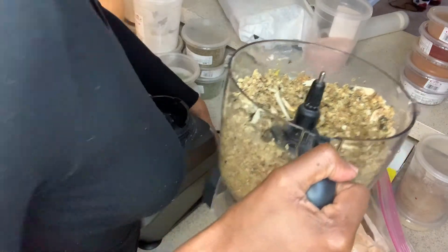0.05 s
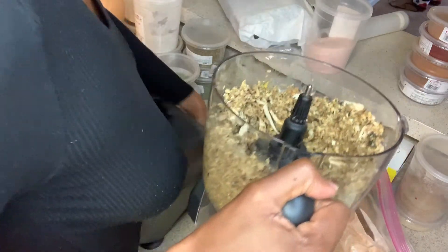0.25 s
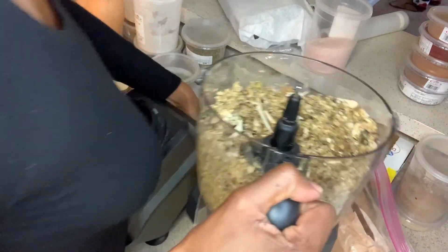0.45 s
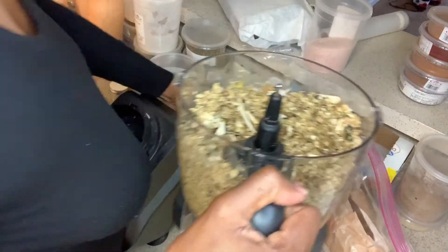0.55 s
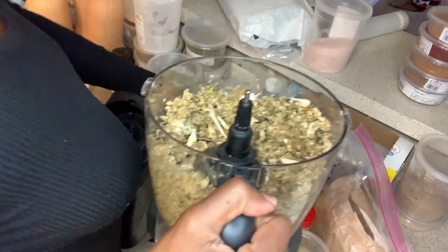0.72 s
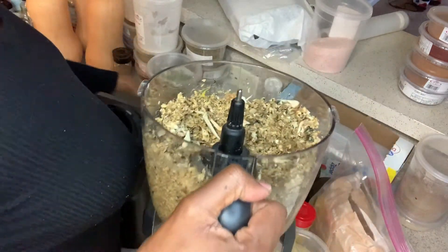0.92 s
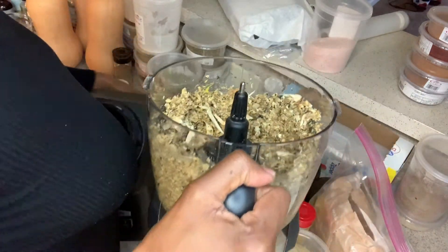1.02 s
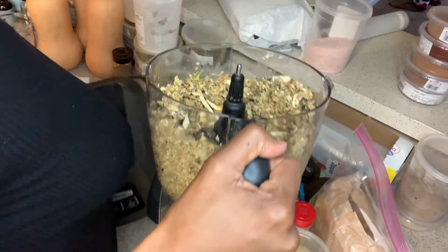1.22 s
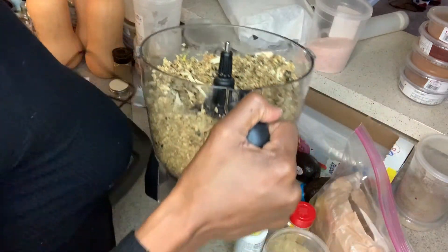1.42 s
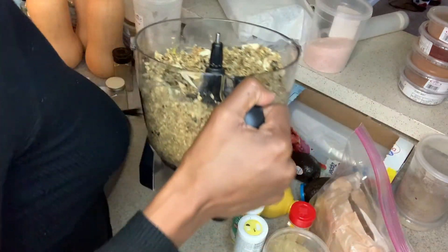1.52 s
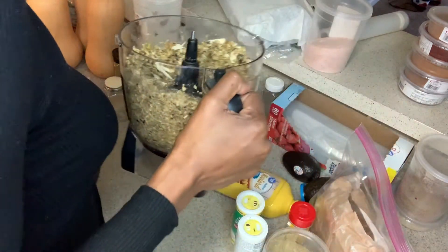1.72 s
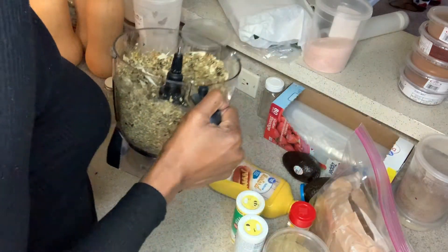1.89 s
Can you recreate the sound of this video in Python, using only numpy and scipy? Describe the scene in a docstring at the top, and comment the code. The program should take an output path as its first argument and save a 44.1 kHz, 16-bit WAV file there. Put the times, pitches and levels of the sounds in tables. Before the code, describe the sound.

Close stereo sound of a food processor bowl being handled in a lively kitchen: brief scrape, sharp loud clack, soft bumps and ticks, later blade clicks and dull dragging knocks, over faint appliance hum.

```python
"""Food processor bowl coming loose

A full plastic bowl is handled on a kitchen counter, close to the microphone. It scrapes free of its
catch, then lands one loud clack: a coloured noise crack over ringing modes, with a thump in the counter.
Its parts tick, snap and knock dully, built from short noise bursts; the loose blade pings and food rustles.
A dense decaying echo rings after each blow, over wavering appliance hum and soft air noise."""
import sys
import numpy as np
from scipy import signal
from scipy.fft import rfft, irfft
from scipy.io import wavfile
from scipy.ndimage import uniform_filter1d

SR = 44100
rng = np.random.default_rng(int(sys.argv[2]) if len(sys.argv) > 2 else 0)


def master_out(mix):
    """Clip the mix to full scale and print it as 16-bit PCM to the path in sys.argv[1]."""
    frames = np.transpose(np.atleast_2d(mix))
    ceiling = np.clip(frames, -1, 1)
    pcm = np.round(ceiling * 32767).astype(np.int16)
    wavfile.write(sys.argv[1], SR, pcm)


N = 85995  # length in samples

CLACK_LEAD_S, PARTS_LEAD_S = 0.00008, -0.000024  # how much earlier the left microphone hears it
TICK_WET_DB = 3  # room tail on the ticks and the rustle


def amp(db):
    """Decibels to gain."""
    return 10 ** (np.asarray(db) / 20)


def read(points, hz):
    """Reads a (frequency, value) table on a log-frequency axis."""
    f, value = np.transpose(points)
    return np.interp(np.log(hz + 1), np.log(f + 1), value)


def unit(x):
    """Scales to rms 1."""
    return x / np.sqrt(np.mean(x ** 2) + 1e-20)


def add(mix, start_s, sound):
    """Mixes a sound in at start_s, cut off at the end of the mix."""
    part = mix[round(start_s * SR):][:len(sound)]
    part += sound[:len(part)]


def causal(gain, size=4096):
    """Minimum phase: the most compact causal response with this spectrum."""
    both_sides = np.r_[gain, gain[-2:0:-1]]
    log_gain = np.log(np.maximum(both_sides, 1e-5))
    spectrum = np.exp(np.conj(signal.hilbert(log_gain)))
    return np.fft.ifft(spectrum).real[:size]


def contact(colour_db, decay_s, rise_s, size=4096):
    """A burst of tiny impacts with an even spectrum, coloured by colour_db(hz)."""
    t = np.arange(size) / SR
    hz = np.fft.rfftfreq(size, 1 / SR)
    envelope = np.exp(-t / decay_s) * (1 - np.exp(-t / rise_s))
    burst = rfft(rng.standard_normal(size) * envelope)
    # divide by the smoothed spectrum, so that only the colour shapes the burst
    local = np.sqrt(uniform_filter1d(abs(burst) ** 2, size=15))
    colour = causal(amp(colour_db(hz)) / local)
    return signal.fftconvolve(irfft(burst), colour)[:size]


def mode(t, hz, t60_s):
    """One vibration dying by 60 dB in t60_s."""
    return np.exp(-np.log(1000) * t / t60_s) * np.sin(2 * np.pi * hz * t)


def ring(modes):
    """A struck part: the sum of its modes, neighbours swinging in opposite directions."""
    t = np.arange(SR // 4) / SR
    return sum((-1) ** k * amp(db) * mode(t, hz, t60_s) for k, (hz, db, t60_s) in enumerate(modes))


# modes of the bowl: pitch_hz, level_db, t60_s
BOWL_MODES = [(684, -19, 0.046), (1014, -18, .035), (1263, -11, .03), (1567, -18, .035), (1950, -16, .025),
              (2046, -13, 0.025), (2960, -15, .03), (3180, -17, .025), (3770, -14.5, 0.019),
              (3980, -17.5, 0.044)]
# colour of the contact crack: freq_hz, level_db
CRACK_COLOUR = [(100, 25.5), (400, 15), (1000, 18.5), (2000, 17), (4000, 19.5), (4900, 5), (7000, 7.5),
                (8600, -17.5), (10500, 7), (14000, -2.5), (16000, -16.5)]
# colour of the scrape over the catch, and of the rebounds: freq_hz, level_db
CATCH_COLOUR = [(100, 6), (400, 11.5), (1000, 11.5), (2000, 12.5), (4000, 9), (4900, -8), (7000, -8),
                (8600, -40), (11000, -19), (16000, -26.5)]
# the bowl rebounds after the blow: start_s, level_db
BOWL_REBOUNDS = [(0.2429, -3), (.2532, -2), (0.2569, -5), (0.273, -5), (.2820, -7.5), (.3120, -9)]
CATCH_AT_S, CATCH_DECAY_S, CATCH_RISE_S = 0.2172, 0.019, 0.0014
BLOW_AT_S, CRACK_DELAY_S = 0.2337, 0.000696  # the crack follows the wall's snap
CRACK_DECAY_S, CRACK_RISE_S, REBOUND_DECAY_S = 0.0022, 0.000067, 0.0013
SNAP_HZ, SNAP_PEAK_S, SNAP_DB = 1474, 0.00027, -3.5
RING_DB, CLACK_WET_DB = -1.5, -1.5


def clack():
    """A short scrape, then the blow: a snap of the wall, a crack, a brief ring, and chatter to rest."""
    out = np.zeros(N)
    t = np.arange(SR // 4) / SR
    crack_at_s = BLOW_AT_S + CRACK_DELAY_S
    scrape = contact(lambda hz: read(CATCH_COLOUR, hz), CATCH_DECAY_S, CATCH_RISE_S)
    snap = np.sin(2 * np.pi * SNAP_HZ * t) * t / SNAP_PEAK_S * np.exp(1 - t / SNAP_PEAK_S)
    crack = contact(lambda hz: read(CRACK_COLOUR, hz), CRACK_DECAY_S, CRACK_RISE_S)
    add(out, CATCH_AT_S, scrape)
    add(out, BLOW_AT_S, amp(SNAP_DB) * snap)
    add(out, crack_at_s, amp(RING_DB) * ring(BOWL_MODES))
    add(out, crack_at_s, crack)
    for start_s, db in BOWL_REBOUNDS:
        rebound = contact(lambda hz: read(CATCH_COLOUR, hz), REBOUND_DECAY_S, CRACK_RISE_S)
        add(out, start_s, amp(db) * rebound)
    return kitchen(out, CLACK_WET_DB, CLACK_LEAD_S)


# modes of counter and motor base under the blow: pitch_hz, level_db, t60_s
COUNTER_MODES = [(59.1, -21, 0.37), (85.4, -19.5, 0.18), (119.7, -13.5, 0.13), (194.3, -13.5, 0.15),
                 (247, -27, 0.25), (436, -38, 0.32)]
# the catch and the blow each push the counter: start_s, level_db
COUNTER_PUSHES = [(0.2190, 0), (0.2347, -4.5)]
# the bowl bumps softly against the base: start_s, level_db
SOFT_BUMPS = [(.074, -8), (.7195, 2), (.782, -10), (1.148, -7)]
# modes of a soft bump: pitch_hz, level_db, t60_s
BUMP_MODES = [(121, -35.5, 0.16), (193.7, -34, 0.12), (256, -34.5, 0.067), (530, -40, 0.057)]
THUMP_RISE_CYCLES, THUMP_WET_DB = 1.3, -12


def thump():
    """Catch and blow set base and counter swinging, low modes building slowest; soft bumps join in."""
    out = np.zeros(N)
    t = np.arange(SR) / SR
    swing = np.zeros(SR)
    for hz, db, t60_s in COUNTER_MODES:
        rise = 1 - np.exp(-(t * hz / THUMP_RISE_CYCLES) ** 2)
        swing += amp(db) * rise * mode(t, hz, t60_s)
    for start_s, db in COUNTER_PUSHES:
        add(out, start_s, amp(db) * swing)
    for start_s, db in SOFT_BUMPS:
        add(out, start_s, amp(db) * ring(BUMP_MODES))
    return kitchen(out, THUMP_WET_DB, CLACK_LEAD_S)


# ticks, snaps and rubs of the plastic parts: start_s, decay_s, then
# low_db, mid_db, high_db, top_db at the four frequencies of TICK_BANDS
PART_TICKS = [(0.076, 0.0025, -6, -12.5, -16, -41.5), (0.674, 0.0059, -4.5, -2, -21, -37),
              (0.707, 0.0021, -9, -10, -15.5, -48), (0.7134, 0.0036, -3.5, -7.5, -28, -44),
              (0.7207, 0.0021, -0.5, -10.5, -30, -44), (0.782, 0.015, -12, -13, -24.5, -28.5),
              (0.818, 0.008, -12, -2, -25.5, -51), (0.847, 0.0055, -8, -8, -35, -48),
              (0.8809, 0.0067, -6, -3.5, -25, -37), (0.9326, 0.0025, -7, -8, -24, -26),
              (1.2847, 0.0019, -36, -14, -19, -18), (1.2881, 0.0017, -21, -12, -15, -13),
              (1.4302, 0.01, -3.5, -10.5, -21, -20), (1.4521, 0.0021, -0.5, -13, -5.5, -12.5),
              (1.4570, 0.0093, 4.5, -3, -28, -30), (1.4634, 0.004, 4, -11, -16, -24),
              (1.4810, 0.0041, -1, -7.5, -22, -25), (1.8896, 0.0026, -19, -3, -27.5, -27)]
# where those four levels apply: freq_hz
TICK_BANDS = [400, 1500, 5000, 12000]
# colour that all ticks share, added to their own: freq_hz, level_db
TICK_COLOUR = [(50, -5.5), (130, -10.5), (250, 3.5), (1000, -3.5), (2700, -8.5), (4600, -3), (7000, -4),
               (8600, -31.5), (10500, -4), (14000, -12.5), (16000, -18.5)]
TICK_RISE_S = 0.00086


def ticks():
    """Light contacts of plastic on plastic, each with its own brightness."""
    out = np.zeros(N)
    for start_s, decay_s, *band_db in PART_TICKS:
        own_colour = list(zip(TICK_BANDS, band_db))
        tick = contact(lambda hz: read(own_colour, hz) + read(TICK_COLOUR, hz), decay_s, TICK_RISE_S)
        add(out, start_s, tick)
    return kitchen(out, TICK_WET_DB, PARTS_LEAD_S)


# dull knocks: start_s, level_db
DULL_KNOCKS = [(1.5360, -8), (1.546, 0.5), (1.5550, -0.5), (1.5643, 2), (1.581, -3.5), (1.5885, -9.5),
               (1.5980, -7.5), (1.6480, -12.5)]
# colour of the knocks and of the drag: freq_hz, level_db
KNOCK_COLOUR = [(60, -5), (180, 2.5), (400, 9), (800, 7.5), (1200, 5), (1850, -0.5), (2300, -14.5),
                (4000, -31), (9000, -69)]
KNOCK_DECAY_S, KNOCK_RISE_S, KNOCK_WET_DB = 0.0028, 0.0004, 2.5
DRAG_MID_S, DRAG_HALF_S, DRAG_DB, SLIPS_PER_S = 1.585, 0.05, -47, 270


def knocks():
    """The bowl judders as it is dragged: a few dull knocks among many fine slips."""
    out = np.zeros(N)
    t = np.arange(N) / SR
    for start_s, db in DULL_KNOCKS:
        knock = contact(lambda hz: read(KNOCK_COLOUR, hz), KNOCK_DECAY_S, KNOCK_RISE_S)
        add(out, start_s, amp(db) * knock)
    slips = unit(rng.standard_normal(N) * (rng.random(N) < SLIPS_PER_S / SR))
    colour = causal(amp(read(KNOCK_COLOUR, np.fft.rfftfreq(4096, 1 / SR))))
    slips = unit(signal.fftconvolve(slips, colour)[:N])
    swell = np.exp(-((t - DRAG_MID_S) / DRAG_HALF_S) ** 4)
    out += amp(DRAG_DB) * slips * swell
    return kitchen(out, KNOCK_WET_DB, PARTS_LEAD_S)


# modes of the steel blade: pitch_hz, level_db, t60_s
BLADE_MODES = [(5421, -48, .16), (6783, -56, .07), (8220, -60, .05), (11150, -55, .06)]
# modes of its plastic hub, before each click's ratios: pitch_hz, level_db, t60_s
HUB_MODES = [(3908, -5.5, 0.039), (4550, -4, 0.017), (4900, -0.5, 0.027), (5670, -0.5, 0.02),
             (6150, -7, .014), (13730, -5, .015)]
# the hub clicks on the shaft: start_s, level_db, pitch_ratio, ring_length_ratio
SHAFT_CLICKS = [(.7078, -47, 0.92, .4), (1.2875, -39, .86, .35), (1.4527, -34, 1, 0.89),
                (1.4558, -42, 0.97, .8)]
PING_AT_S, PING_HELD_S, BLADE_WET_DB = 1.4301, 0.022, -4


def blade():
    """The loose blade pings until its plastic hub clicks against the shaft and damps it."""
    out = np.zeros(N)
    t = np.arange(SR // 4) / SR
    damping = np.exp(-(t / PING_HELD_S) ** 6)  # timed to close at a hub click
    add(out, PING_AT_S, ring(BLADE_MODES) * damping)
    for start_s, db, pitch, length in SHAFT_CLICKS:
        hub = [(hz * pitch, level_db, t60_s * length) for hz, level_db, t60_s in HUB_MODES]
        add(out, start_s, amp(db) * ring(hub))
    return kitchen(out, BLADE_WET_DB, PARTS_LEAD_S)


# chopped food shifts in the bowl: middle_s, half_length_s, level_db
FOOD_SHIFTS = [(0.453, 0.073, -51.5), (0.8, 0.069, -61.5), (1.858, 0.3, -65)]
# colour of the food grains: freq_hz, level_db
FOOD_COLOUR = [(300, 18), (2500, 10), (6000, 3.5), (8600, -23.5), (12000, -1.5), (16000, -21)]
GRAINS_PER_S = 740


def rustle():
    """Faint grains of chopped food sliding in short swells."""
    t = np.arange(N) / SR
    grains = rng.standard_normal(N) * (rng.random(N) < GRAINS_PER_S / SR)
    colour = amp(read(FOOD_COLOUR, np.fft.rfftfreq(N, 1 / SR)))
    grains = unit(irfft(rfft(grains) * colour, N))
    swell = sum(amp(db) * np.exp(-((t - mid_s) / half_s) ** 2) for mid_s, half_s, db in FOOD_SHIFTS)
    return kitchen(grains * swell, TICK_WET_DB, PARTS_LEAD_S)


# left-right likeness of diffuse sound: freq_hz, correlation (1 = alike, 0 = unrelated)
STEREO_LIKENESS = [(100, 0.94), (200, 0.94), (350, 0), (700, 0), (16000, 0)]


def pair(noise):
    """Spectra of two noises as the two microphones hear them: alike in the bass."""
    a, b = rfft(noise)
    hz = np.fft.rfftfreq(noise.shape[1], 1 / SR)
    same = np.clip(read(STEREO_LIKENESS, hz), -1, 1)
    mid = a * np.sqrt((1 + same) / 2)
    side = b * np.sqrt((1 - same) / 2)
    return hz, np.array([mid + side, mid - side])


# decay of the kitchen: freq_hz, t60_s
KITCHEN_DECAY = [(100, 0.62), (260, 0.42), (700, 0.49), (1840, 0.55), (4850, 0.53), (12000, 0.46)]
ROOM_BUILD_S = 0.0018
# early scatter off counter and bowl, different at each microphone, kept out of the bass
NEAR_S, NEAR_DB, NEAR_LOW_HZ = 0.0004, -6, 700


def kitchen(x, wet_db, lead_s):
    """The direct sound, early scatter off counter and bowl, and a dense tail that dies band by band."""
    taps = irfft(pair(rng.standard_normal((2, SR)))[1])
    age = np.arange(SR) / SR
    hz, t, z = signal.stft(taps, SR, nperseg=256)
    decay = amp(-60 * t / read(KITCHEN_DECAY, hz)[:, None])
    tail = signal.istft(z * decay, SR, nperseg=256)[1][:, :SR]
    tail = tail * (1 - np.exp(-(age / ROOM_BUILD_S) ** 2))
    near = (taps - taps[::-1]) * age * np.exp(-age / NEAR_S)  # left minus right: pure width
    near = signal.sosfilt(signal.butter(2, NEAR_LOW_HZ, "high", fs=SR, output="sos"), near)
    echoes = amp(wet_db) * tail / np.linalg.norm(tail[0])
    echoes = echoes + amp(NEAR_DB) * near / np.linalg.norm(near[0])
    delay = np.exp(-2j * np.pi * np.fft.rfftfreq(N, 1 / SR) * lead_s)
    right = irfft(rfft(x) * delay, N)
    return np.array([x, right]) + signal.fftconvolve(x[None], echoes, axes=1)[:, :N]


# appliance hum lines: pitch_hz, level_db (rms)
HUM_LINES = [(59.2, -54), (123.8, -50.5), (166.9, -55.5), (333.8, -56), (478, -68), (535, -63.5),
             (667.5, -59)]
# relative colour of the room's air: freq_hz, level_db (per Hz)
AIR_COLOUR = [(25, -37), (42, -3.5), (139, -6), (285, -9.5), (531, -5.5), (601, -11.5), (664, -3),
              (830, -17), (1150, -15), (1930, -28), (5100, -41), (7780, -50), (8810, -72), (13800, -54),
              (16000, -91)]
AIR_DB, HUM_WAVER, HUM_WAVER_HZ = -45.5, 0.35, 4.1  # air rms, waver depth (ratio), waver bandwidth


def background():
    """Appliance hum lines, wavering in level and phase, over dull steady air noise."""
    hz, z = pair(rng.standard_normal((2, N)))
    out = amp(AIR_DB) * unit(irfft(z * amp(read(AIR_COLOUR, hz)), N))
    t = np.arange(N) / SR
    slow = np.exp(-(np.fft.fftfreq(N, 1 / SR) / HUM_WAVER_HZ) ** 2)
    for pitch_hz, db in HUM_LINES:
        noise = rng.standard_normal(N) + 1j * rng.standard_normal(N)
        waver = np.fft.ifft(np.fft.fft(noise) * slow)
        carrier = np.exp(2j * np.pi * (pitch_hz * t + rng.random()))
        tone = (1 + HUM_WAVER * waver / np.std(waver)) * carrier
        out = out + amp(db) * unit(tone.real)
    return out


def scene():
    """All sources in the kitchen."""
    return clack() + thump() + ticks() + knocks() + blade() + rustle() + background()


LOW_CUT_HZ, EDGE_HZ = 36, 16000


def record(dry):
    """The microphone drops the deep bass and rounds off the loudest peaks; then the band limit."""
    dry = signal.sosfilt(signal.butter(3, LOW_CUT_HZ, "high", fs=SR, output="sos"), dry)
    held = dry / (1 + (dry / 0.9) ** 6) ** (1 / 6)  # soft ceiling at 0.9
    band_limit = signal.firwin(255, EDGE_HZ, window=("kaiser", 9), fs=SR)
    return signal.oaconvolve(held, band_limit[None], "same")


dry = scene()
out = record(dry)
master_out(out)
```